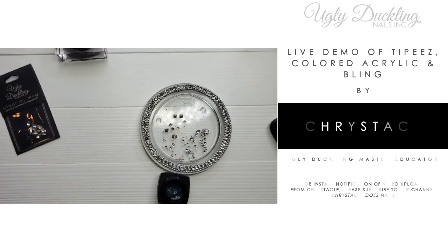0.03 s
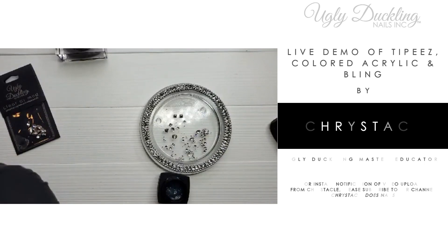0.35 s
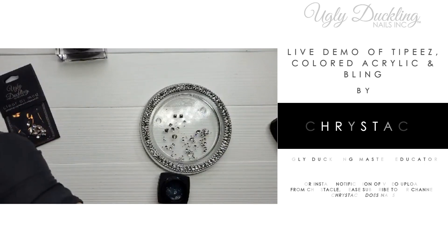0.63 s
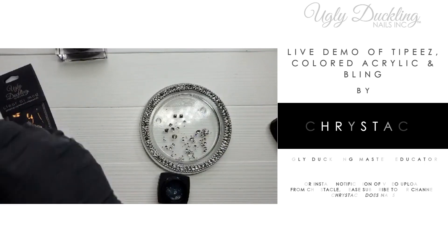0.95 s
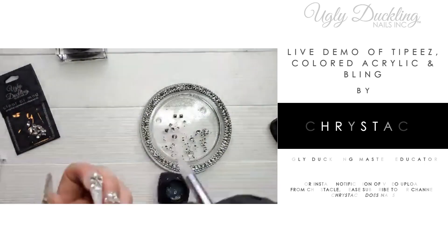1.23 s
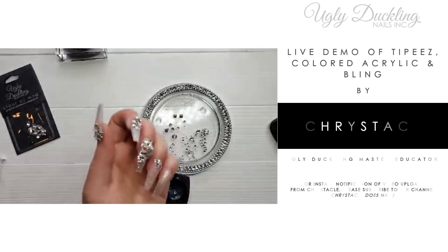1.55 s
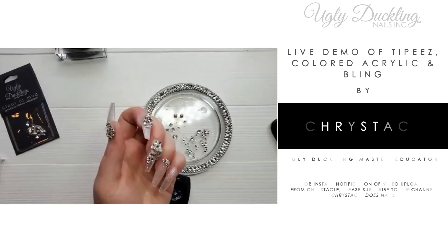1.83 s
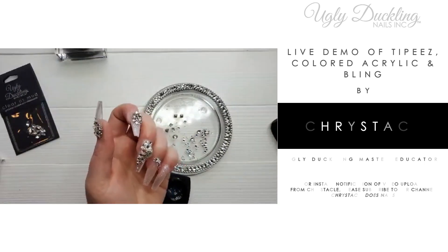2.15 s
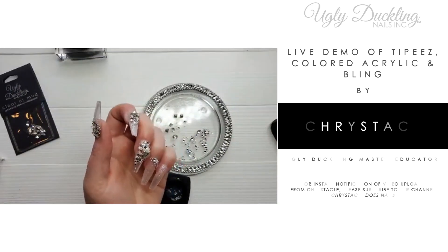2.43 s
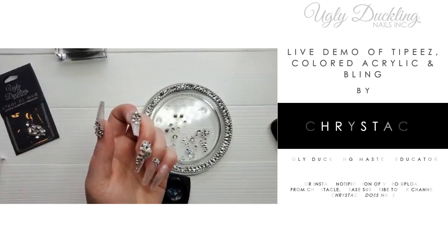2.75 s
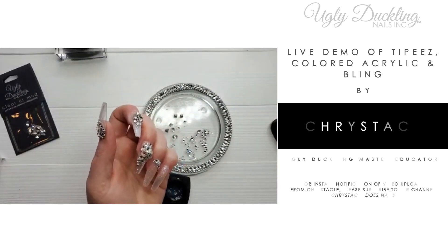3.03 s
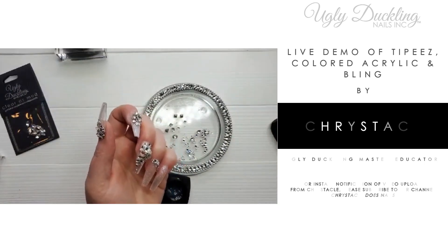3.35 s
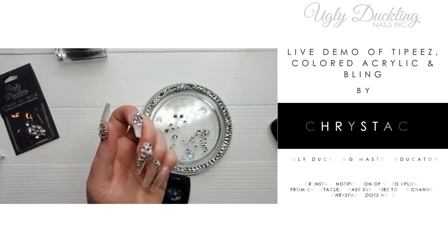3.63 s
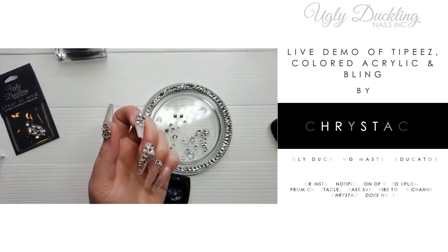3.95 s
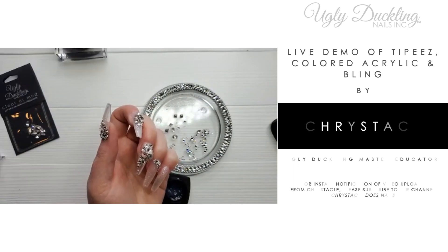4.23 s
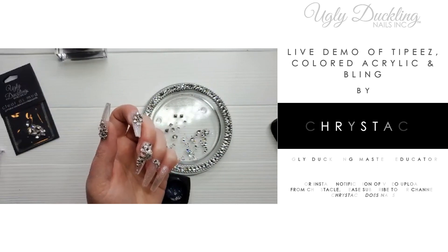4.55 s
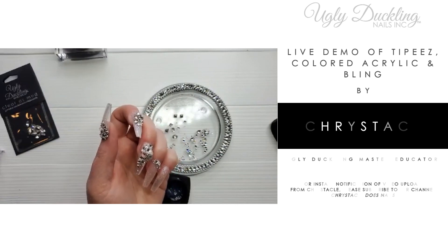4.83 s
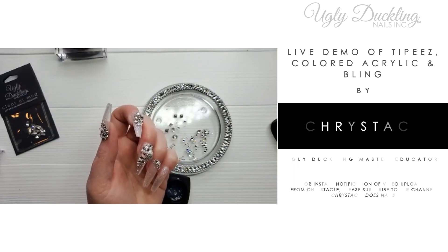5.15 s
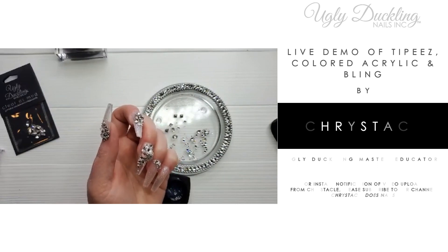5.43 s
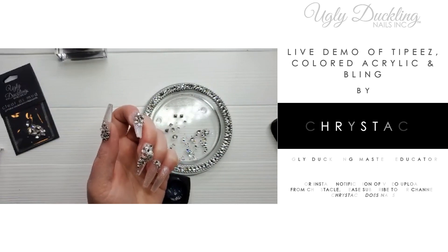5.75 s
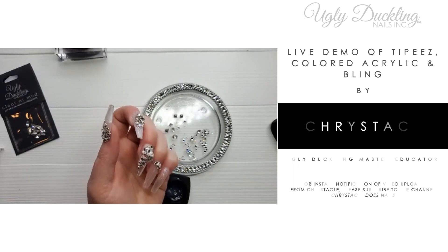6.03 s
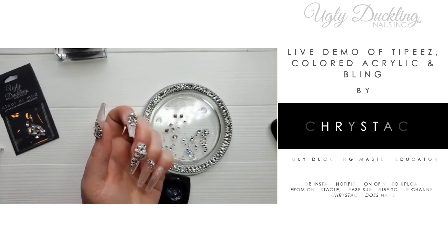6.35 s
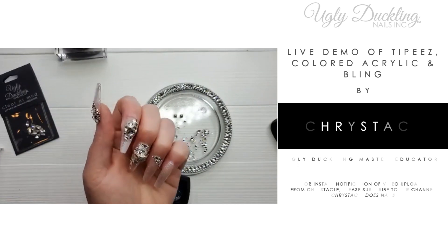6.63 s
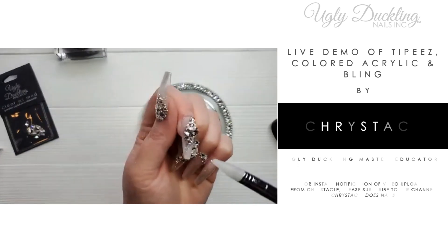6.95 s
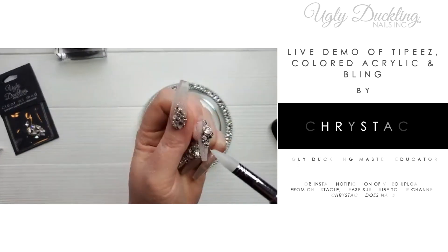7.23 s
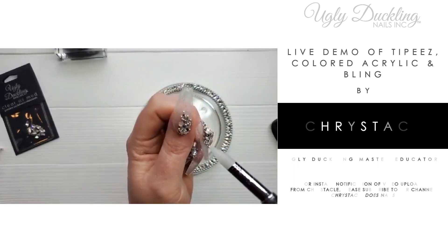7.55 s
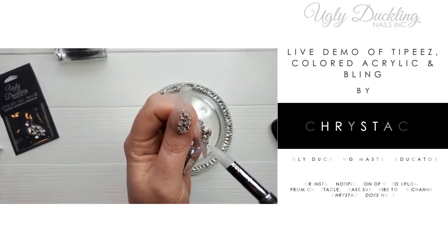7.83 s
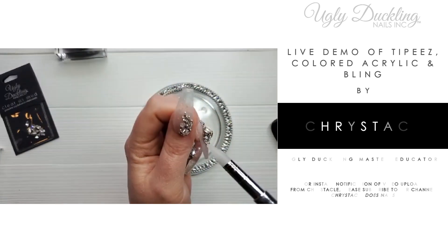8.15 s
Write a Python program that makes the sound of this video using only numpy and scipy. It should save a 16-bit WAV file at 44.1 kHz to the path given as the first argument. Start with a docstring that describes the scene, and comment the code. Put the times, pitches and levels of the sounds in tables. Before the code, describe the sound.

The sound is close, from a microphone on a desk in a small room with a faint low rumble and hiss. In the first second comes a cluster of sharp wooden knocks as a tool is fetched, loudest at about 0.2 and 0.5 seconds, while a hand and sleeve slide over the wood. A bright crystal tick and soft finger pats follow just after 1 second. It turns quiet, with slight brushing. A double knock lands at 2.6 seconds and another knock at 3.4. From 3.8 to 4.3 seconds tiny gems tick against each other and clink faintly in a tray, ending in a light tap. Soft pats come around 5 seconds, then a sharp, bouncing knock at 5.8. A weaker knock and a short rub follow near 6.7 seconds, and faint finger drags and sleeve rustles fade away by 8 seconds.

```python
"""Sharp wooden knocks, heard through a microphone standing on a desk in a small room: nail work.
Hands, long nails and a pick-up tool strike the desktop and a tray of gems, exciting their damped modes.
Tiny crystals tick against each other and loose gems clink. Between the knocks a hand and sleeve
slide over the wood with friction noise, above a low room rumble and a faint hiss that swells at times."""
import sys
import numpy as np
from scipy import signal
from scipy.fft import rfft, irfft, next_fast_len
from scipy.io import wavfile

SR = 44100
rng = np.random.default_rng(int(sys.argv[2]) if len(sys.argv) > 2 else 0)


def bounce(signal):
    """Save signal as a 16-bit WAV file at the path given by the first command-line argument."""
    frames = np.transpose(np.atleast_2d(signal))
    limited = np.clip(frames, -1, 1)
    pcm = np.round(limited * 32767).astype(np.int16)
    wavfile.write(sys.argv[1], SR, pcm)


N = 361179


def from_db(db):
    """Amplitude grows tenfold every 20 dB."""
    return 10 ** (np.asarray(db) / 20)


def unit_rms(x):
    """Normalisation to unit mean power."""
    return x / np.sqrt(np.mean(x ** 2) + 1e-20)


def at_hz(points, hz):
    """Interpolation on a logarithmic frequency axis."""
    known_hz, value = np.transpose(points)
    return np.interp(np.log(hz + 1e-3), np.log(known_hz), value)


def coloured(x, *spectra):
    """Filters in cascade: their gains in dB add."""
    hz = np.fft.rfftfreq(len(x), 1 / SR)
    return irfft(rfft(x) * from_db(sum(at_hz(points, hz) for points in spectra)), len(x))


def noise(spectrum):
    """Stationary filtered noise, rms 1."""
    return unit_rms(coloured(rng.standard_normal(next_fast_len(N)), spectrum)[:N])


def decay(t, t60):
    """Exponential damping: 60 dB in t60 seconds, 1 ms at the quickest."""
    return np.exp(-np.log(1000) * t / np.maximum(t60, 1e-3))


def add(track, start_s, sound):
    """Superposition: a sound adds to the track from start_s on."""
    start = max(round(start_s * SR), 0)
    track[start:start + len(sound)] += sound[:N - start]


# Envelope of the room rumble: time_s, level_db # The brief swell at 5.81 s is the low tail of the knock at 5.76
# s dying away.
RUMBLE_ENVELOPE = [(0.0, -61.5), (0.66, -53.5), (1.39, -76), (2.55, -68.5), (2.83, -72.5), (3.42, -64),
                   (3.81, -69.5), (5.66, -69), (5.81, -53.5), (6.09, -75.5), (6.93, -63.5), (7.16, -72.5),
                   (8.19, -74.5)]
# Spectra of rumble and hiss: frequency_hz, gain_db
RUMBLE_SPECTRUM = [(15, -26.5), (28, -7), (45, -2), (65, -2.5), (95, -7.5), (130, -12.5), (240, -12.5),
                   (300, -18.5), (400, -27.5), (700, -34.5), (1500, -52)]
HISS_SPECTRUM = [(500, -6), (3000, -11), (7500, -6.5), (9800, -8), (12000, 2.5), (14500, -4.5)]


def background(rumble_gain_db=3.0, hiss_db=-90):
    """The noise floor: a low rumble under slow amplitude modulation, and a steady hiss."""
    rumble_db = np.interp(np.arange(N) / SR, *np.transpose(RUMBLE_ENVELOPE))
    rumble = from_db(rumble_db + rumble_gain_db) * noise(RUMBLE_SPECTRUM)
    return rumble + from_db(hiss_db) * noise(HISS_SPECTRUM)


# Reverberation time of the room: frequency_hz, t60_s
REVERB_TIMES = [(100, 0.27), (300, 0.3), (600, 0.15), (1500, 0.45), (4000, 0.39), (8000, 0.22),
                (14000, .22)]


def room(x, build_s=0.012):
    """Reverberation: a diffuse field builds up, then each band decays at its own rate."""
    t, tail = np.arange(SR) / SR, 0
    edges_hz = np.geomspace(40, 16000, 10)
    for low, high in zip(edges_hz, edges_hz[1:]):
        bandpass = signal.butter(2, [low, high], "band", fs=SR, output="sos")
        band = signal.sosfilt(bandpass, rng.standard_normal(SR))
        tail = tail + band * decay(t, at_hz(REVERB_TIMES, np.sqrt(low * high)))
    tail = tail * (1 - np.exp(-t / build_s))
    return signal.fftconvolve(x, tail / np.linalg.norm(tail))[:N]


def rough_noise(spectrum, changes_per_s, uneven_db):
    """Random amplitude modulation roughens noise, as in stick-slip friction; rms 1."""
    flutter = np.interp(np.arange(N) / SR * changes_per_s, np.arange(4000), rng.standard_normal(4000))
    return unit_rms(noise(spectrum) * from_db(uneven_db * flutter))


# Swells of rubbing, rustle and high hiss: peak_s, rise_t60_s, fall_t60_s, rub_db, rustle_db, hiss_db
# A negative rise starts abruptly. The swell at 5.9 s is a knock dying away in the room.
SWELLS = [(0.03, 1.0, 1.2, -65, -81, -66.5), (0.3, -0.94, 1.5, -45.5, -58, -61.5),
          (0.57, 1.17, 1.1, -36.5, -48, -58), (0.77, 0.3, .8, -49.5, -49.5, -54),
          (1.18, 1.1, 1.62, -63, -66.5, -66), (1.6, 1.5, 3.0, -80, -82, -77.5),
          (3.5, 1.45, 2.5, -77, -81, -70), (3.98, 3, 6.5, -80.5, -81, -74),
          (4.5, 5, 4, -75.5, -87.5, -78.5), (5.38, 2.5, 1.7, -77.5, -83, -87),
          (5.9, 0.9, 0.75, -65, -72.5, -86), (6.26, 1.5, 0.8, -89.5, -85, -76),
          (6.72, 0.5, 0.53, -51.5, -58, -69), (7.02, 1.4, .8, -71.5, -85.5, -89.5),
          (7.42, 1.8, 1.2, -78.5, -87, -92.5)]
# Spectra of rubbed wood, rustling sleeve and high treble hiss: frequency_hz, gain_db
RUB_SPECTRUM = [(25, -18), (80, 3.5), (160, -3.5), (250, -1.5), (400, -6), (520, -4.5), (600, 1.5),
                (700, -2), (850, -2.5), (1050, -9), (1250, -8.5), (1450, -11), (2500, -16), (5000, -36)]
RUSTLE_SPECTRUM = [(600, -25), (1500, 0), (2500, 0.5), (4500, 3.5), (6000, -3.5), (8000, -4), (9800, -13.5),
                   (14500, -14)]
HIGH_HISS_SPECTRUM = [(2000, -24), (5000, -7), (7800, -6.5), (9800, -10.5), (12000, 3), (14500, -3)]


def rubbing_and_hiss(resting_rub_db=-84.5, resting_rustle_db=-92):
    """Sliding friction: wood murmurs, sleeve and glove rustle. A high treble hiss swells and fades too."""
    t = np.arange(N) / SR
    rub, rustle, hiss = from_db(resting_rub_db), from_db(resting_rustle_db), 0   # hands never quite rest
    for peak_s, rise_s, fall_s, rub_db, rustle_db, hiss_db in SWELLS:
        swell = decay(np.abs(t - peak_s), np.where(t < peak_s, rise_s, fall_s))
        rub = np.maximum(rub, from_db(rub_db) * swell)
        rustle = np.maximum(rustle, from_db(rustle_db) * swell)
        hiss = np.maximum(hiss, from_db(hiss_db) * swell)
    wood = rub * rough_noise(RUB_SPECTRUM, changes_per_s=100, uneven_db=2.0)
    sleeve = rustle * rough_noise(RUSTLE_SPECTRUM, changes_per_s=79, uneven_db=1.45)
    return wood + sleeve + hiss * noise(HIGH_HISS_SPECTRUM)


def bursts(rows, spectrum, gain_db, swell_s):
    """Envelope shaping: each burst of rough noise rises quickly and decays exponentially."""
    envelope, t = np.zeros(N), np.arange(SR // 2) / SR
    for start_s, level_db, t60 in rows:
        add(envelope, start_s, from_db(level_db + gain_db) * (1 - np.exp(-t / swell_s)) * decay(t, t60))
    return envelope * rough_noise(spectrum, changes_per_s=110, uneven_db=-1.0)


# Short strokes of the hand, and short swells of high hiss: start_s, relative_level_db, t60_s
SLEEVE_BRUSHES = [(1.5194, -66, 0.39), (1.6494, -66, 0.55), (1.9834, -60, 0.69), (2.0494, -67.5, 0.42),
                  (6.8977, -56.5, 0.54), (7.2903, -68, 0.69), (7.423, -67.5, 0.39), (7.8131, -64, 0.46)]
FINGER_DRAGS = [(0.345, -37.5, 0.35), (1.768, -55, 0.24), (1.949, -70, 0.44), (2.44, -55, 0.34),
                (3.249, -59.5, 0.31), (3.314, -55, 0.42), (4.329, -48.5, 0.14), (4.491, -57.5, 0.35),
                (5.195, -49, 0.21), (6.489, -65, 0.4), (6.875, -54.5, 0.65), (6.969, -60, 0.5),
                (7.025, -58, 0.43)]
HISS_SWELLS = [(2.4423, -68.5, 0.66), (2.6594, -56.5, 0.44), (4.2223, -59.5, 0.52), (6.549, -66, 0.9)]
# Spectra of brushing and dragging: frequency_hz, gain_db
BRUSH_SPECTRUM = [(600, -2), (1700, -7.5), (4200, 0), (6000, -6), (8000, -9), (10000, -24), (14500, -8)]
DRAG_SPECTRUM = [(150, -11), (280, 4), (400, -6.5), (520, 0.5), (620, 0.5), (760, -2), (950, -7),
                 (1250, -14), (1700, -23), (4000, -38.5)]


def strokes_and_hiss():
    """Transient friction: glove and sleeve brush, fingers drag on the wood. High hiss swells briefly."""
    brushing = bursts(SLEEVE_BRUSHES, BRUSH_SPECTRUM, gain_db=-10.0, swell_s=0.0042)
    dragging = bursts(FINGER_DRAGS, DRAG_SPECTRUM, gain_db=-6.0, swell_s=0.0018)
    hiss = bursts(HISS_SWELLS, HIGH_HISS_SPECTRUM, gain_db=-3.5, swell_s=0.011)
    return brushing + dragging + hiss


# Loose gems striking the tray: start_s, relative_level_db, pitch_hz
GEM_CLINKS = [(2.2642, -64, 2035), (3.0634, -72, 1820), (3.7581, -56.5, 3120), (3.8813, -59, 3110),
              (4.2225, -53, 2630), (4.3065, -55, 3390)]


def clinks(gain_db=-9.5, t60=0.11, spread=0.15, mode_count=14):
    """Free vibration: a loose gem excites closely spaced tray modes, which beat as they decay."""
    out, t = np.zeros(N), np.arange(SR // 3) / SR
    for start_s, level_db, pitch_hz in GEM_CLINKS:
        offset = rng.standard_normal((mode_count, 1))
        mode_hz = pitch_hz * (1 + spread * offset)
        weight = np.exp(-np.abs(offset))   # modes far from the main pitch ring more weakly
        cluster = (weight * np.sin(2 * np.pi * mode_hz * t)).sum(axis=0)
        add(out, start_s, from_db(level_db + gain_db) * unit_rms(cluster) * decay(t, t60))
    return out


# Crystals touching, in relative band levels: start_s, treble_db, body_db, sparkle_db
CRYSTAL_TICKS = [(1.1097, -38.5, -34.5, -50), (2.4428, -67, -76.5, -83.5), (2.484, -66.5, -65, -71),
                 (2.6753, -57, -49, -68), (3.7598, -35.5, -58, -40.5), (3.8813, -37.5, -58, -42),
                 (3.9805, -50.5, -61.5, -53.5), (3.9867, -52, -70.5, -58.5), (4.012, -48, -77.5, -59),
                 (4.0378, -54, -70, -72.5), (4.2234, -62, -53.5, -72.5), (4.3127, -61, -50.5, -65.5)]
# Where those levels apply: body_hz, lower_treble_hz, upper_treble_hz, sparkle_hz
TICK_BANDS_HZ = [3500, 5500, 9500, 12000]
# Spectrum common to all ticks: frequency_hz, gain_db
TICK_SPECTRUM = [(900, -6), (2000, -13), (2900, -10.5), (4200, -4), (5300, -4.5), (6200, -2), (7400, -3.5),
                 (8400, -4), (10800, -0.5), (12300, 9), (13600, 6.5), (15000, -22)]


def crystals(gain_db=1.5, t60=0.021, rebound_s=0.0021, rebound_db=3.5):
    """A brief impact has a broad spectrum: each crystal ticks brightly, then louder on its rebound."""
    out, t = np.zeros(N), np.arange(SR // 20) / SR
    for start_s, treble_db, body_db, sparkle_db in CRYSTAL_TICKS:
        force = list(zip(TICK_BANDS_HZ, [body_db, treble_db, treble_db, sparkle_db]))
        for lag_s, touch_db in [(0, 0), (rebound_s, rebound_db)]:
            tick = coloured(rng.standard_normal(len(t)), TICK_SPECTRUM, force) * decay(t, t60)
            add(out, start_s + lag_s, from_db(gain_db + touch_db) * tick)
    return out


# Registers of a blow: thump_hz, lower_mid_hz, upper_mid_hz, lower_clack_hz, upper_clack_hz, edge_hz
BLOW_BANDS_HZ = [250, 500, 950, 1800, 3400, 6500]


def force_spectrum(pitch_hz, thump_db, clack_db, edge_db, hump_db=5.0, half_width_octaves=0.11):
    """Excitation spectrum (frequency_hz, gain_db): the registers plus the striker's own resonance."""
    hz = np.geomspace(100, 10000, 120)
    registers = list(zip(BLOW_BANDS_HZ, [thump_db, 0, 0, clack_db, clack_db, edge_db]))
    resonance_db = hump_db * np.exp(-(np.log2(hz / pitch_hz) / half_width_octaves) ** 2)
    return np.transpose([hz, at_hz(registers, hz) + resonance_db])


# Modes of desk and tray: frequency_hz, struck_at_side_db, struck_near_tray_db, nominal_t60_s
DESK_MODES = [(102, -15.5, -2, 0.23), (166.6, -8, -5.5, 0.17), (254, -6, -4, 0.19),
              (319.3, -13.5, -6, 0.049), (498, -12.5, -43.5, 0.11), (553, -17, -8, 0.059),
              (590.7, -11.5, -10, 0.089), (652.6, -11.5, -10.5, 0.13), (713, -12, -20, 0.1),
              (779.5, -9, -22, 0.08), (868, -21, -15, 0.11), (936, -15.5, -17.5, 0.16),
              (1079, -17, -29, 0.1), (1163.3, -13.5, -14.5, .09), (1254, -14, -10.5, 0.11),
              (1494, -14, -14, 0.058), (1638, -20, -21.5, 0.17), (1758, -20, -11.5, 0.082),
              (2115, -18, -28.5, 0.18), (2325, -22, -17.5, 0.088), (2483, -16, -28, 0.11),
              (2975, -19.5, -68, 0.13), (3496, -23.5, -23.5, 0.16)]
# Spectra of the crowd of weaker modes and of the contact crack: frequency_hz, gain_db
CROWD_SPECTRUM = [(25, -10.5), (80, 3.5), (260, 5.5), (400, 3), (620, -1.5), (900, 1), (1200, -3.5),
                  (1420, -3), (1800, -1.5), (2900, -8.5), (4200, -9), (6500, -4.5), (8200, -5.5),
                  (9700, -13), (12000, -10.5), (14500, -13)]
CRACK_SPECTRUM = [(200, -9.5), (700, 7.5), (1400, 4.5), (3000, 3), (6000, 1), (14500, -6)]
NOMINAL_RING_S = 0.12   # the ring_s at which the modes have their listed t60
TOOL_IN_HAND_S = 1.3   # blows land at the side, where the tool is fetched, until then; later by the tray


def blow(start_s, strength_db, force, crack_db, ring_s, contact_s=0.000089, spread_s=0.0024,
         modes_db=1.0, crowd_db=3.5, scatter_db=0.67, load_shift=0.0084, crack_t60=0.013):
    """Modal superposition: the force spectrum and the striking point weight each mode of desk and tray."""
    t = np.arange(SR // 3) / SR
    hz, side_db, tray_db, t60 = np.transpose(DESK_MODES)
    place_db = side_db if start_s < TOOL_IN_HAND_S else tray_db
    polarity = (-1) ** np.arange(len(hz))   # neighbouring modes move the microphone in opposite senses
    weight = polarity * from_db(at_hz(force, hz) + place_db + scatter_db * rng.standard_normal(len(hz)))
    # the weight of the hand detunes the modes a little
    loaded_hz = hz * (1 + load_shift * rng.standard_normal(len(hz)))
    damping = decay(t, t60[:, None] * ring_s / NOMINAL_RING_S)
    modes = weight @ (np.sin(2 * np.pi * loaded_hz[:, None] * t) * damping)
    crowd = coloured(rng.standard_normal(len(t)), CROWD_SPECTRUM, force) * decay(t, ring_s)
    crack = coloured(rng.standard_normal(len(t)), CRACK_SPECTRUM, force) * decay(t, crack_t60)
    # the contact sounds at once; bending waves take a moment to fill the desktop
    contact = (from_db(crowd_db) * crowd + from_db(crack_db) * crack) * (1 - np.exp(-t / contact_s))
    ringing = from_db(modes_db) * modes * (1 - np.exp(-t / spread_s))
    return from_db(strength_db) * (contact + ringing)


# Soft pats of fingers and palm: start_s, strength_db, relative_thump_db
FINGER_PATS = [(0.9953, -39, -37), (1.0544, -49.5, -26), (1.146, -45.5, -6), (1.2243, -49.5, -8),
               (1.7476, -56.5, -1), (2.3923, -52.5, -14), (4.361, -48, -19), (5.058, -53.5, 6),
               (5.174, -49, -2.5), (5.6708, -52.5, 1), (5.7184, -39, -4)]


def pats():
    """Inelastic impact: soft flesh lands without a bounce and excites little treble."""
    out = np.zeros(N)
    for start_s, strength_db, thump_db in FINGER_PATS:
        force = force_spectrum(pitch_hz=615, thump_db=thump_db, clack_db=-16, edge_db=-33)
        pat = blow(start_s, strength_db, force, crack_db=-4, ring_s=0.14,
                   contact_s=0.0011, spread_s=0.0052)
        add(out, start_s, pat)
    return out


# Hard things set down on the desk: start_s, strength_db, pitch_hz, thump_db, clack_db, edge_db,
# crack_db, ring_s, bounce_count, bounce_gap_s, bounce_loss_db
# Thump, clack, edge and crack are relative to the strength; a negative loss makes the bounce harder.
DESK_KNOCKS = [(0.1795, -12.5, 780, -9.5, 0, -17.5, -8.5, 0.082, 2, 0.018, 4),
               (0.2742, -32, 686, -18, -11, -14.5, -3, 0.24, 0, 0, 0),
               (0.431, -34, 1251, -33, 6, -11, -8, .13, 0, 0, 0),
               (0.481, -27, 950, -16, 4, -26, -17, .035, 1, 0.026, -1),
               (0.5241, -4.5, 430, -9, -6, -18, -0.5, .07, 1, .0075, 9),
               (0.7233, -20, 590, -34, 0.5, -10.5, 5, .09, 0, 0, 0),
               (0.7509, -26.5, 740, -7, -2, -26, -15, .09, 0, 0, 0),
               (0.841, -18.5, 607, -15, -3, -15.5, -2, .15, 1, .0165, 13),
               (0.8916, -35, 895, -18, -2, -19, 0, 0.12, 0, 0, 0),
               (2.6025, -24.5, 593, -22.5, -7.5, -36, -10, 0.13, 1, .013, 4.5),
               (2.6536, -28, 589, -12, -9, -35, -6.5, .08, 0, 0, 0),
               (3.392, -21, 600, -20, -6, -21.5, -17, 0.086, 1, .0107, 4),
               (4.2233, -62, 2600, -1, 6, -7.5, -3.5, 0.17, 0, 0, 0),
               (4.3042, -46.5, 717, -21, -4.5, -16, -2, .17, 1, 0.0095, 2),
               (5.7567, -19, 490, -8.5, -3, -12.5, -4, 0.11, 2, .0145, 2),
               (6.656, -38, 526, -5, -13.5, -18, -19, 0.12, 1, .028, 0)]


def knocks(duller_db=0.5, ring_growth=1.15):
    """Impact and rebound: each bounce is duller, usually weaker, and damps the desk less."""
    out = np.zeros(N)
    for (start_s, strength_db, pitch_hz, thump_db, clack_db, edge_db,
         crack_db, ring_s, bounces, gap_s, loss_db) in DESK_KNOCKS:
        for k in range(round(bounces) + 1):
            force = force_spectrum(pitch_hz, thump_db, clack_db - k * duller_db, edge_db - k * duller_db)
            knock = blow(start_s, strength_db - k * loss_db, force, crack_db, ring_s * ring_growth ** k)
            add(out, start_s + k * gap_s, knock)
    return out


def scene(desk_room_db=-11.0, gem_room_db=-7.5):
    """Direct and reverberant sound of the impacts add to friction, hiss and the noise floor."""
    desk = knocks() + pats()
    gems = crystals() + clinks()
    reflections = room(from_db(desk_room_db) * desk + from_db(gem_room_db) * gems)
    return (desk + gems + reflections + strokes_and_hiss() + rubbing_and_hiss() + background())[None]


def record(dry, headroom=0.7, cutoff_hz=14300):
    """Soft saturation in the microphone chain rounds the peaks; a steep low-pass cuts the top."""
    lowpass = signal.ellip(10, .2, 70, cutoff_hz, fs=SR, output="sos")
    return signal.sosfilt(lowpass, headroom * np.tanh(dry / headroom))


dry = scene()
out = record(dry)
bounce(out)
```